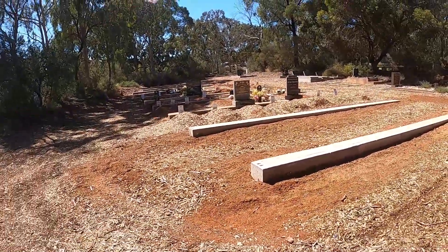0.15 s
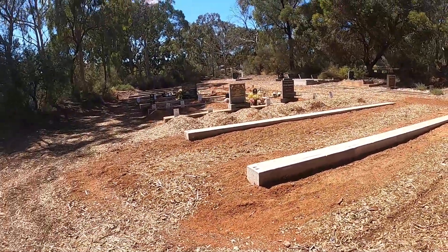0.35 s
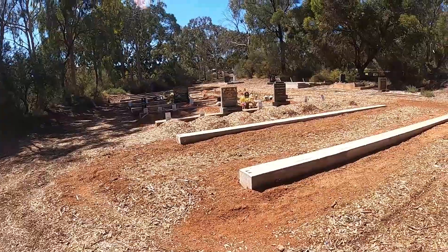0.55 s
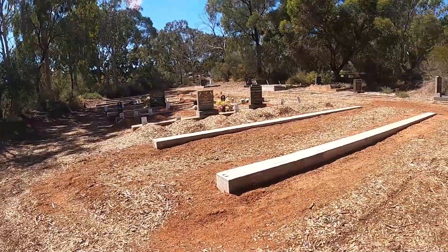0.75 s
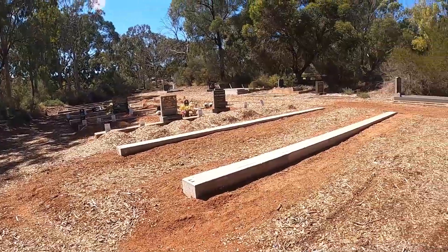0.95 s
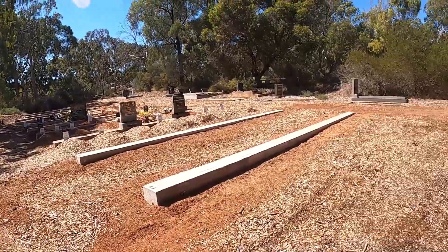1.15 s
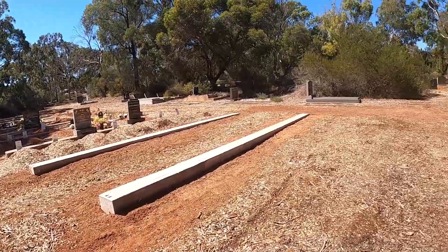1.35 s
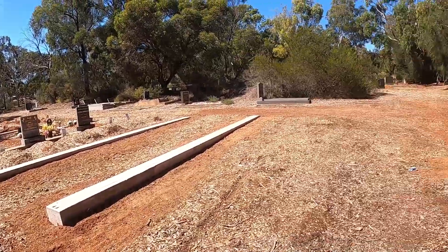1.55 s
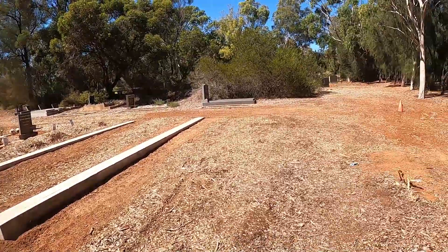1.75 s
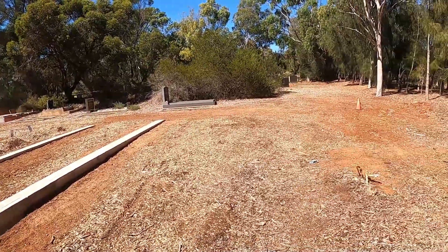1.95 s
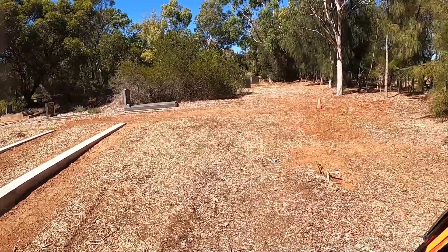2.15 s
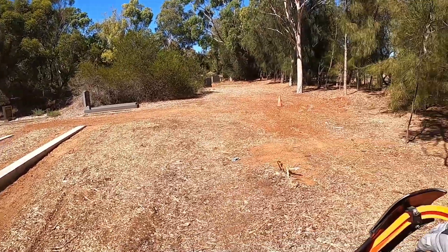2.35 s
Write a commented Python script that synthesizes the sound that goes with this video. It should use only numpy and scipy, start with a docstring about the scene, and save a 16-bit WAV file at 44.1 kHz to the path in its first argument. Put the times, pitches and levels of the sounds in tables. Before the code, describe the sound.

A single-cylinder four-stroke motorcycle idles outdoors, heard from the saddle: about fifteen slightly uneven chugs a second with valve clatter, intake gulps and whirr. Midway, the rider's head turns toward the engine and the clatter brightens.

```python
"""A single-cylinder four-stroke motorcycle idles outdoors, heard from the saddle. In each cycle the exhaust valve opens
with a tick, gas rushes out, and the valve shuts and clacks; both movements push the gas and ring the pipe. Then a
tappet knocks and the intake gulps. The cases whirr, swelling once a cycle, over a low unsteady rumble. After most of
a second the rider's head turns toward the engine, which brightens the clatter and changes the pipe's colour."""
import sys
import numpy as np
from scipy import signal
from scipy.fft import rfft, irfft, next_fast_len
from scipy.io import wavfile
from scipy.ndimage import uniform_filter1d, map_coordinates

SR = 44100
rng = np.random.default_rng(int(sys.argv[2]) if len(sys.argv) > 2 else 0)


def store_pcm(level_fs):
    """Save levels as 16-bit WAV."""
    pcm = np.round(np.clip(level_fs, -1, 1) * 32767).astype(np.int16)
    wavfile.write(sys.argv[1], SR, np.atleast_2d(pcm).T)


N = 110250
RUN_IN = SR // 4  # samples of run-in before and after the scene

# The unsteady idle. Each row: time in seconds, engine speed in four-stroke cycles per second.
SPEED = [(0, 15.254), (.198, 14.715), (.498, 15.557), (.635, 14.639), (.876, 15.455), (1.145, 15.058),
         (1.371, 14.514), (1.372, 14.632), (1.697, 15.201), (1.813, 14.209), (2.212, 15.603),
         (2.364, 14.842), (2.5, 15.716)]
START_CYCLE = .346  # share of the cycle already past at the start; 0 = exhaust valve opens
CHUFF_CYCLE, CLACK_CYCLE, INTAKE_CYCLE = .17, .31, .78  # gas rush peaks, valve seats, intake gulps
INTAKE_RISE_MS, INTAKE_FALL_MS = 2.5, 9


def exhaust_pipe(turn, cycles):
    """Opening and shutting of the valve each push the gas column, which rings the pipe and silencer modes."""
    # Pipe and silencer modes. Each row: frequency in Hz, width in Hz, then signed shares at valve opening and
    # at shutting with the head facing away, and the same two shares facing the engine.
    pipe_modes = [(48.2, 8, 2.13, -2.08, 2.44, -2.28), (76.9, 53.4, -4.91, -.61, -5.85, -.86),
                  (85.4, 34.3, 4.88, .75, 6.26, 1.22), (131.2, 18.5, 4.44, -.14, 3.78, .54),
                  (201.6, 29.2, 2.4, 1.01, 1.95, .81), (228.7, 20.2, .78, .23, 1.8, -.47),
                  (318.4, 22.1, .23, .17, -1.34, -.46), (428, 20, -1.2, -.8, .2, .2),
                  (545, 22, -.7, -.4, .15, .1)]
    push_places = (0, .263)  # share of the cycle: valve opens, valve shuts
    push_softness_s = (.00054, .00067)
    push_db, scatter_db = -60.0, 0.43  # strength and its scatter from push to push
    size = SR * amp(push_db + scatter_db * rng.standard_normal((len(cycles), 2)))
    pushes = [train(moments(place, cycles), size[:, k]) for k, place in enumerate(push_places)]

    def ring(push, column, softness_s):
        def response(f):
            modes = sum(row[column] * mode(f, row[0], row[1]) for row in pipe_modes)
            return modes / (1 + 2j * np.pi * f * softness_s) ** 2
        return filtered(push, response)

    def heard(first_column):
        both = sum(ring(push, first_column + k, push_softness_s[k]) for k, push in enumerate(pushes))
        return both[RUN_IN:][:N]

    return (1 - turn) * heard(2) + turn * heard(4)


# The burst tables below share one layout. Columns: place as a share of the cycle, rise in ms, fall in ms,
# strength of the knock over the noise, level in dB facing away, level in dB facing the engine, then a list
# of resonances, each with frequency in Hz, width in Hz (before squaring) and gain in dB.


def gas_rush(turn, cycles):
    """Spent gas chuffs out after the exhaust valve opens, with a thin high jet of hiss."""
    # Chuff of the gas rush, in the burst columns.
    chuff = (CHUFF_CYCLE, 3.4, 16, 21.6, -39.5, -44, [(399.6, 210, 4.5), (589, 140, -1.5), (990, 59, -7.5),
             (1490, 160, -6), (2370, 1230, -13)])
    # Hissing jet, in the burst columns.
    jet = (.18, 6, 14, .1, -64, -68, [(8300, 1000, -1), (9800, 1800, 1)])
    return burst(turn, cycles, *chuff) + burst(turn, cycles, *jet)


def valve_gear(turn, cycles):
    """Metal parts strike: the exhaust valve ticks open and clacks on its seat, and a tappet knocks."""
    # Tick of the opening valve, in the burst columns.
    open_tick = (.02, .5, 1.5, 1.5, -62, -72, [(9700, 1800, 0.5)])
    # Clack of the valve on its seat, in the burst columns.
    shut_clack = (CLACK_CYCLE, 1.2, 10, .8, -60.5, -45, [(1480, 1400, 3.5), (4800, 2000, -1),
                  (8400, 2000, -11), (11000, 3000, -21)])
    # Knock of the tappet, in the burst columns.
    tappet = (.6, 2, 6, 3, -45.5, -41, [(3600, 300, 2), (950, 130, 6), (3000, 1300, -5), (9500, 3000, -29)])
    return sum(burst(turn, cycles, *row) for row in (open_tick, shut_clack, tappet))


def intake(turn, cycles):
    """The intake gulps air late in the cycle: a hollow low gulp, then a brighter suck."""
    # Low gulp, in the burst columns.
    gulp = (INTAKE_CYCLE, INTAKE_RISE_MS, INTAKE_FALL_MS, 22, -32.5, -32, [(328, 62, 5.5), (420, 92, 4.5),
            (576, 114, 5), (830, 115, -6.5), (970, 120, -5), (1296, 250, -13)])
    # Brighter suck, in the burst columns.
    suck = (.82, 2.6, 4.3, 2.3, -47.5, -37.5, [(1300, 900, 5.5), (2330, 1200, 4), (3770, 3000, -1),
            (6000, 2600, -13)])
    return burst(turn, cycles, *gulp) + burst(turn, cycles, *suck)


def burst(turn, cycles, place, rise_ms, fall_ms, knock, away_db, near_db, peaks):
    """A knock inside a puff of noise once a cycle, through its own steep resonances."""
    strength_scatter_db, place_scatter = 1.3, .008  # place as a share of the cycle
    luck = rng.standard_normal((len(cycles), 2))
    strikes = moments(place + place_scatter * luck[:, 0], cycles)
    blows = train(strikes, amp(strength_scatter_db * luck[:, 1]))
    t_ms = np.arange(-SR // 20, SR // 20 + 1) * 1000 / SR
    rise = np.exp(-.5 * (t_ms / rise_ms) ** 2)
    fall = np.exp(-np.abs(t_ms) / fall_ms)
    puff = signal.fftconvolve(blows, np.where(t_ms < 0, rise, fall), "same")
    drive = knock * blows + puff * rng.standard_normal(len(blows))

    def colour(f):  # neighbouring resonances alternate in sign
        return sum((-1) ** k * amp(db) * mode(f, hz, w) ** 2 for k, (hz, w, db) in enumerate(peaks))

    norm = np.sqrt(np.mean(np.abs(colour(np.linspace(1, SR / 2, SR // 10))) ** 2))
    level = amp(away_db + turn * (near_db - away_db))
    return level * filtered(drive, colour)[RUN_IN:][:N] / norm


def engine_whirr(turn):
    """Whirr of the cases blended between two head positions, swelling and sinking once a cycle."""
    # Whirr facing away. Each row: frequency in Hz, relative density in dB per Hz.
    away_spectrum = [(200, -48), (280, -11.5), (416, -17.5), (600, -16), (720, -26.5), (950, -14.5),
                     (1230, -24.5), (1730, -28.5), (2300, -33.5), (2700, -33), (3700, -40), (5200, -43.5),
                     (5800, -53), (7000, -53.5), (8300, -56.5), (11000, -60.5), (13000, -62.5),
                     (15500, -85)]
    # Whirr facing the engine. Each row: frequency in Hz, relative density in dB per Hz.
    near_spectrum = [(200, -36), (280, -21), (400, -22.5), (600, -16.5), (765, -22.5), (900, -20),
                     (1400, -21.5), (1900, -26.5), (2900, -27), (3600, -25.5), (4400, -40), (5500, -39.5),
                     (6800, -48), (7500, -52), (9500, -57.5), (12000, -61.5), (15500, -93)]
    # Case resonances facing away. Each row: frequency in Hz, width in Hz, lift in dB.
    away_cases = [(933, 54, 1.5), (2720, 120, 2), (3460, 470, 3.5), (5330, 100, 2.5), (6140, 130, 10),
                  (8120, 340, 7.5)]
    # Case resonances facing the engine. Each row: frequency in Hz, width in Hz, lift in dB.
    near_cases = [(1095, 140, 3.3), (1430, 310, 5.6), (2570, 69, 4.8), (3200, 200, 2.5), (5200, 250, 1.2)]
    away_db, near_db = -36.5, -36
    swell_db, swell_cycle = 1.5, .05  # depth either way, and the share of the cycle where it is loudest
    away = amp(away_db) * np.sqrt(1 - turn) * whirr(away_spectrum, away_cases)
    near = amp(near_db) * turn * whirr(near_spectrum, near_cases)
    swell = amp(swell_db * np.cos(2 * np.pi * (crank() - swell_cycle)))
    return swell * (away + near)


def whirr(spectrum, cases):
    """Gears, chain and bearings: grainy, patchy noise through the cases."""
    grain_db, patch_db = 2.5, -1.5  # fast flicker, slower patches
    grainy = rng.standard_normal(N) * amp(grain_db * wobble(700))
    z = signal.stft(grainy, nperseg=256)[2]
    # patches: a random level map smoothed over frequency, then time
    field = uniform_filter1d(rng.standard_normal(z.shape), size=4, axis=0)
    field = uniform_filter1d(field, size=5, axis=1)
    patchy = signal.istft(z * amp(patch_db * unit(field)), nperseg=256)[1][:N]

    def response(f):
        lift_db = sum(db * np.abs(mode(f, hz, w)) ** 2 for hz, w, db in cases)
        return amp(along(spectrum, f) + lift_db)

    return unit(filtered(patchy, response))


def rumble():
    """Low unsteady shudder of frame and air: noise shaped to the deep bass."""
    # Each row: frequency in Hz, relative density in dB per Hz.
    rumble_spectrum = [(20, -9), (60, 8), (150, -7), (300, 1), (500, -88)]
    shudder = filtered(rng.standard_normal(N), lambda f: amp(along(rumble_spectrum, f)))
    return amp(-53.5) * unit(shudder)  # rms level in dB


def crank():
    """Cycles turned, per sample: the running sum of engine speed."""
    return START_CYCLE + np.cumsum(curve(SPEED)) / SR


def moments(place, cycles):
    """Sample at which each cycle, from the one before the start, reaches its place."""
    # places before the start are reached at the opening speed; those past the end land out of earshot
    early = np.min([place + cycles - START_CYCLE, 0 * cycles], axis=0) / SPEED[0][1] * SR
    return np.interp(place + cycles, crank(), np.arange(N), right=N + SR // 8) + early


def train(at, size):
    """Impulses of the given sizes, with run-in before and after."""
    return np.bincount(np.round(at).astype(int) + RUN_IN, size, N + SR // 2)


def mode(f, hz, width):
    """One causal resonance, as a complex response of frequency."""
    return 1j * f * width / (hz * hz - f * f + 1j * f * width)


def filtered(x, response):
    """x times a complex response of frequency."""
    m = next_fast_len(len(x) + SR // 2)
    return irfft(rfft(x, m) * response(np.fft.rfftfreq(m, 1 / SR)), m)[:len(x)]


def along(points, hz):
    """(Hz, dB) points joined on a log frequency axis, -120 dB outside."""
    f, db = np.transpose(points)
    return np.interp(np.log(hz + 1), np.log(f + 1), db, left=-120, right=-120)


def curve(rows):
    """(seconds, value) rows joined into one value per sample."""
    return np.interp(np.arange(N) / SR, *np.transpose(rows))


def wobble(rate):
    """A smooth random curve, rate knots a second."""
    knots = rng.standard_normal(int(N * rate / SR) + 4)
    return map_coordinates(knots, [np.arange(N) * rate / SR])


def amp(db):
    """dB to gain."""
    return 10 ** (np.asarray(db) / 20)


def unit(x):
    """Scaled to rms 1."""
    return x / np.sqrt(np.mean(x ** 2) + 1e-20)


def scene():
    """The idling engine around the rider's turning head: pipe, bursts, whirr and rumble."""
    # Each row: time in seconds, turn of the head from 0 (facing away) to 1 (facing the engine).
    head_turn = [(0, 0), (.9, 0), (1.5, 0.27), (1.7, 0.49), (1.85, 0.75), (2.1, 0.97), (2.5, 1)]
    turn = np.clip(curve(head_turn), 0, 1)
    cycles = np.arange(-1, 40)
    bursts = gas_rush(turn, cycles) + valve_gear(turn, cycles) + intake(turn, cycles)
    return (exhaust_pipe(turn, cycles) + bursts + engine_whirr(turn) + rumble())[None]


def record(dry):
    """The microphone at the saddle thins the deepest bass and keeps nothing above its band limit."""
    low_hz, top_hz = 21, 15600

    def response(hz):
        return (hz < top_hz) / np.sqrt(1 + (low_hz / (hz + 1)) ** 8)

    return filtered(dry[0], response)[None]


dry = scene()
out = record(dry)
store_pcm(out)
```